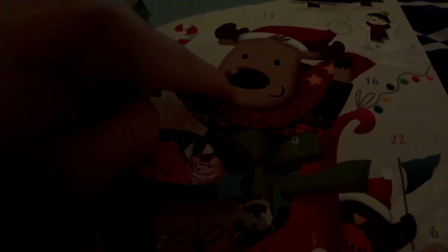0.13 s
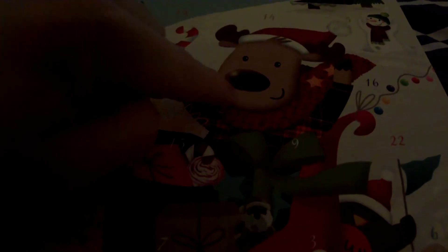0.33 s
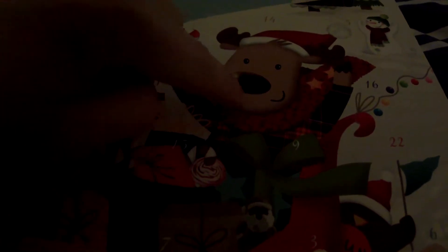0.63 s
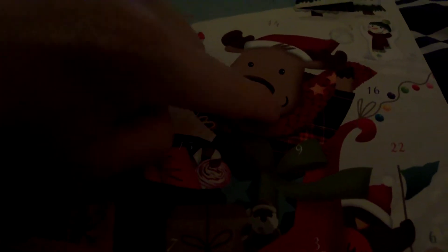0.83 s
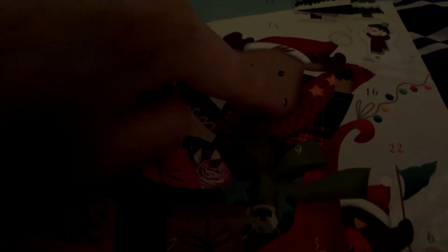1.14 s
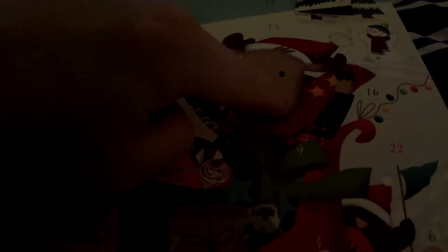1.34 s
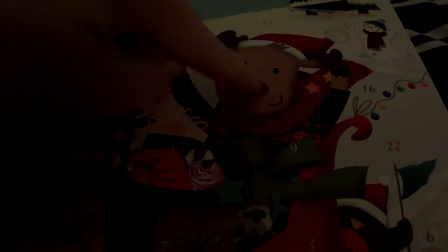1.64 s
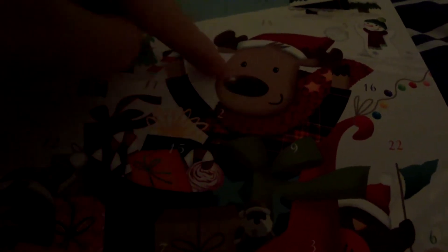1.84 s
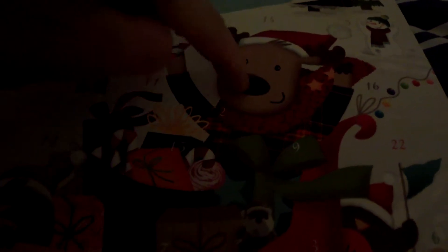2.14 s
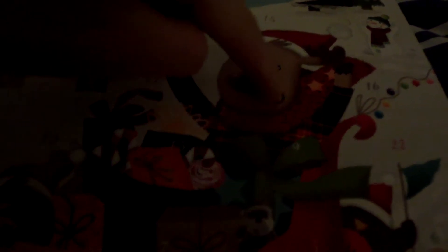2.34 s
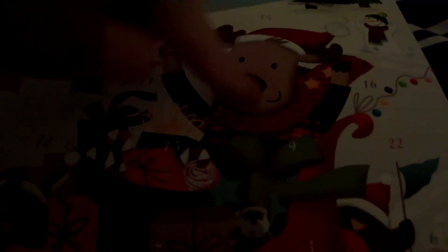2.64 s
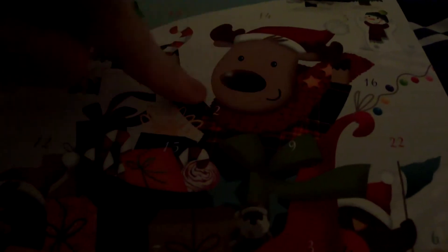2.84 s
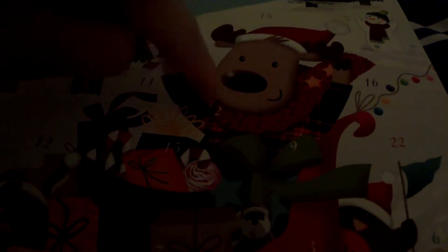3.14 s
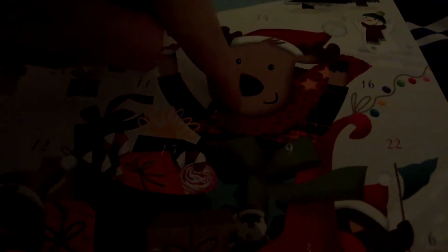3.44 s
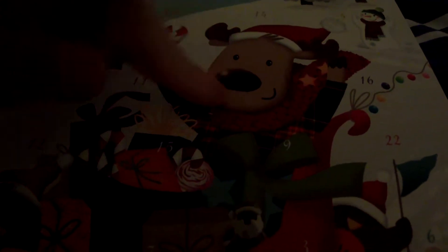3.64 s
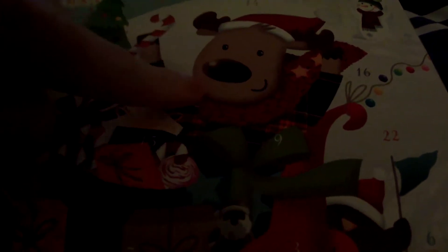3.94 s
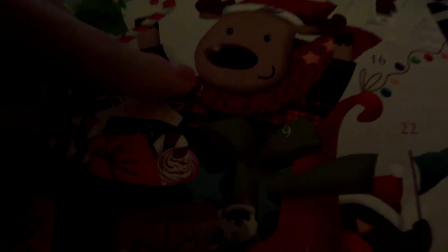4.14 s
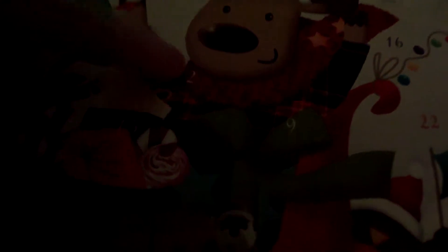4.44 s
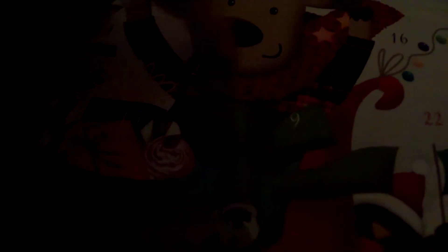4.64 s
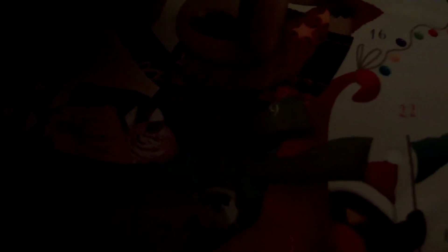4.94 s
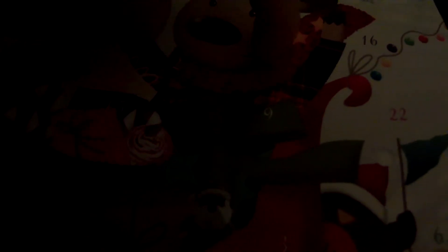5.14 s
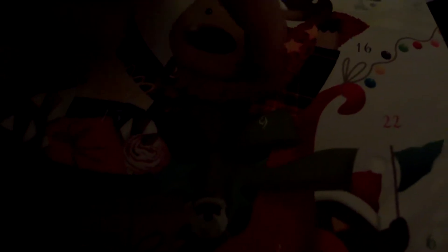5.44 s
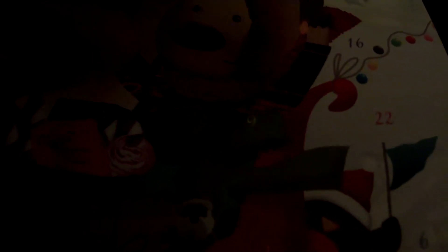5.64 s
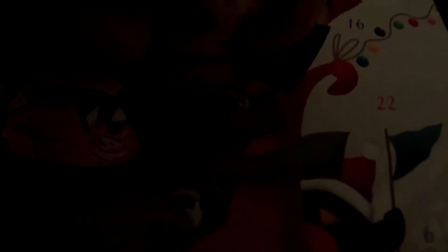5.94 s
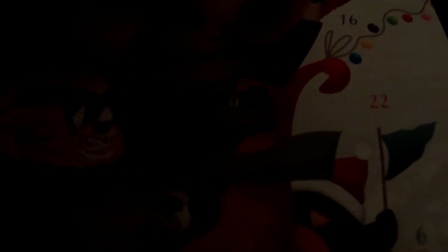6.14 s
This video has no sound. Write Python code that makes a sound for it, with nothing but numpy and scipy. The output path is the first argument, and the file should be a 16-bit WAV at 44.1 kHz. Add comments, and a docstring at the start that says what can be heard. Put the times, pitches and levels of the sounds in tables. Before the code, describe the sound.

A fingertip rubs and picks at a cardboard flap very near a small microphone in a quiet room. Dry crackles come in uneven clusters, with low handling bumps early on. Just after three seconds several hard snaps stand out, then the picking nearly stops, with faint dull taps. From about 4.7 seconds brisk, fine crackling returns until the end, over rumble and soft hiss.

```python
"""A fingertip rustles on a cardboard flap over rumble and hiss, with short crackles throughout, very near
a small microphone in a quiet room. Fingers and nails pick and press: fibres let go in swarms of tiny
breaks that ring the modes of the hollow box, and skin sticks and slips in smaller random bursts.
Slips of the hand send low pushes of pressure into the microphone; later the finger pad taps dully.
Faint sparse echoes give the room; a low drone comes and goes, and a thin steady whine lies above."""
import sys
import numpy as np
from scipy import signal
from scipy.fft import rfft, irfft
from scipy.io import wavfile
from scipy.ndimage import uniform_filter1d

SR = 44100
rng = np.random.default_rng(int(sys.argv[2]) if len(sys.argv) > 2 else 0)


def materialize(psi):
    """Save the field psi as 16-bit PCM at rate SR to the path in sys.argv[1].

    A 1-D psi becomes a single channel; in a 2-D psi each row is a channel.
    """
    bounded = np.clip(np.atleast_2d(psi).T, -1, 1)
    quanta = np.round(bounded * 32767).astype(np.int16)
    wavfile.write(sys.argv[1], SR, quanta)


def ratio_of_db(decibels):
    """Turn decibels (scalar or array-like) into linear amplitude factors; 0 dB maps to 1."""
    return 10 ** (np.asarray(decibels, float) / 20)


N = 276815  # samples, about 6.3 s

# low rumble of handling: t/s, level/dB rms
RUMBLE_LEVEL = [(0, -45.5), (.6, -48.5), (1.05, -45.5), (1.2, -36.5), (1.5, -48.5), (2.7, -45.5),
                (5.5, -45), (6.28, -50.5)]
# spectrum of the rumble: f/Hz, relative density/dB per Hz
RUMBLE_COLOUR = [(8, -21), (14, 8), (26, 5), (50, -12), (120, -9.5), (170, -23.5), (400, -32.5),
                 (1000, -100)]
# low drone that comes and goes: t/s, level/dB rms
DRONE_LEVEL = [(3.7, -66), (4.1, -53), (5.2, -53), (5.4, -66)]
# spectrum of the hiss: f/Hz, relative density/dB per Hz
HISS_COLOUR = [(88, 9), (150, 1.5), (388, -4.5), (844, -10), (1420, -61), (1630, -7), (1870, -28),
               (3160, -6), (4750, -12), (7130, -14.5), (9730, -24.5), (14300, -22), (15500, -32)]
# thin steady tone of the electronics: f/Hz, level/dB rms
WHINE = [(14425, -85)]
# strokes of the fingertip on the card: t of firmest press/s, drive of mid modes/dB,
# pressing time/s, easing time/s, high modes above mid/dB
STROKES = [(0.0, -49, .05, 0.056, -9), (.15, -55, 0.17, 0.69, -0.5), (.44, -54, 0.58, 0.037, -5),
           (0.588, -56, 0.049, .2, -1.5), (.94, -50, 0.35, 0.21, -4), (1.15, -51.5, .2, 0.18, -1),
           (1.75, -51, 0.14, 0.27, -1), (2.13, -49.5, 0.17, 0.15, -0.5), (2.35, -46, 0.19, 0.26, 0.5),
           (2.67, -56, 0.1, .5, 1), (2.9, -51.5, 0.37, 0.24, -10.5), (3.03, -44.5, 0.16, 0.98, 1.5),
           (3.23, -32.5, 0.13, 0.12, -8), (3.46, -45.5, .04, 0.1, 8), (3.53, -49, 0.1, 0.13, -5),
           (3.72, -58, 0.13, 0.073, -12), (3.92, -56.5, 0.078, 0.17, -2), (4.3, -57, 0.17, 0.21, -1.5),
           (4.75, -62, 0.37, 0.11, 11.5), (4.84, -60.5, 0.26, 0.083, 5.5), (5.09, -47.5, 0.093, 0.063, -5),
           (5.23, -55.5, 0.059, 0.046, 1), (5.47, -46.5, 0.16, 0.21, -1.5), (5.83, -51, 0.054, .2, -1),
           (5.96, -43, 0.14, 0.21, -11), (6.28, -55, 0.13, .1, -11)]
# fibres letting go: t/s, drive of mid modes/dB, low modes above mid/dB, high modes above mid/dB,
# nominal length/ms
CRACKLES = [(0.039, -43.5, -17, -6, 15.4), (0.068, -48.5, -2, 2, 20.4), (0.198, -45.5, -5, 1, 11.5),
            (0.218, -42, -8.5, -4, 21), (0.239, -47, -8, 6, 7), (0.254, -45, -16, 2.5, 10.4),
            (0.269, -44, -24, -2, 8.7), (0.281, -41.5, -9, -15, 15), (0.317, -44.5, -5, 10.5, 12),
            (0.336, -44, -12, -1.5, 17), (0.391, -43.5, -13, -5, 7.5), (0.433, -44, 1, -8.5, 8.2),
            (0.459, -47, -2, -3, 6), (0.468, -45.5, -3.5, -1.5, 12), (0.547, -38.5, -11, 1, 12.2),
            (0.8, -43, -3, -2, 11.3), (0.847, -50, 6, -6, 7.9), (0.902, -39, -5, 8, 6),
            (0.874, -58, 0, -10, 3.9), (0.931, -37, -2, -6, 9), (0.95, -33.5, -1.5, -7, 6.5),
            (0.991, -41.5, -10, -6.5, 16), (1.015, -45, -14, -1, 6.4), (1.044, -45, -7, 0, 12),
            (1.088, -41, -4.5, 1, 17), (1.125, -34, -2.5, -5, 7.8), (1.244, -41, -22, 3, 5.5),
            (1.278, -47, -5.5, -3.5, 21.5), (1.367, -32, -11, -7.5, 5.5), (1.45, -38, -5, 0, 14),
            (1.654, -46.5, -1, -14, 13), (1.677, -44, -2.5, 2.5, 12.6), (1.704, -37.5, -10, -1.5, 12.7),
            (1.759, -32, -17, -5, 6.2), (1.773, -46, -2, 2, 11), (1.826, -46, -25, -0.5, 9.3),
            (1.871, -45.5, -7, -1, 19), (1.923, -41, -17, 1.5, 9.3), (2.046, -46.5, -27, 6, 5.3),
            (2.084, -53, -12, 6, 5), (2.123, -38, -9, 0.5, 9.3), (2.14, -41, -21, -7, 8.1),
            (2.175, -51.5, -21, 1, 12), (2.24, -44.5, -13, 3, 16), (2.278, -40.5, -11, -3, 14),
            (2.308, -45.5, -6, 3.5, 13), (2.339, -40.5, -14, -5, 15), (2.361, -34.5, -18, -1.5, 10),
            (2.445, -52, -12, 1.5, 7.2), (2.467, -48.5, -0.5, 7, 8), (2.489, -35, -33, -4.5, 6.4),
            (2.577, -41.5, -25, -3.5, 10.7), (2.646, -37, -6.5, -4.5, 11.4), (2.679, -45.5, -3, 6, 4),
            (2.729, -36.5, -7.5, -2, 5.8), (2.803, -42, -29, -2.5, 9.1), (2.855, -44.5, 0.5, 1, 7.6),
            (2.9, -45, -25, -6, 10.6), (2.978, -43, -11, 3, 12.6), (3.019, -46, -21, -2, 17),
            (3.065, -46.5, -9, 6, 24), (3.082, -26.5, -11.5, -7, 8.3), (3.099, -37, -30, 3, 24),
            (3.167, -43.5, -21, 8.5, 15), (3.2, -22.5, -3.5, -1.5, 8.4), (3.227, -17.5, -5, -12.5, 5.8),
            (3.238, -31, 2, -2.5, 14.7), (3.328, -53, -13, -9, 4.5), (3.372, -42, 1, 3, 2.67),
            (3.423, -16.5, -5.5, -3.5, 8.4), (3.507, -24, -8.5, -2.5, 11.6), (3.677, -53, 0.5, 4.5, 7.9),
            (3.703, -52, -1, -4, 9.6), (3.739, -48.5, 3.5, -3.5, 10.8), (3.884, -41, -17, 0, 4.3),
            (3.9, -52.5, -2, 0, 4.3), (3.948, -49.5, 6, -18, 7.7), (4.145, -58, -6, 1, 4),
            (4.163, -48.5, -1.5, -9, 6.9), (4.195, -66, -3, 15, 25), (4.355, -63, 8.5, -14, 12),
            (4.38, -55, -14, 11.5, 2.3), (4.522, -57, -15, 14, 3.5), (4.691, -38, -8, -10, 6.5),
            (4.799, -41.5, -16, 2.5, 4.3), (4.82, -39.5, -12, 3, 2.4), (4.844, -38, -6, -0.5, 4.3),
            (4.86, -43.5, -14, -1, 4.6), (4.876, -48.5, -4, -1, 9.1), (4.947, -59, -12, 20, 3.4),
            (4.964, -44.5, -19, -3, 7.1), (5.009, -44.5, -4, -23, 5.2), (5.031, -38.5, -6.5, -8.5, 9.1),
            (5.057, -38.5, -9, -1, 5.3), (5.1, -33, -7, -2, 3), (5.118, -46, -2, -6, 3.8),
            (5.131, -37.5, -10, 2, 4.2), (5.142, -43.5, -5.5, 2, 6.5), (5.189, -45, -2, -0.5, 9.8),
            (5.228, -43.5, -0.5, -15, 9.7), (5.395, -40.5, -4, -9, 6.3), (5.409, -54, -26, 13, 12),
            (5.43, -41, -16, 1, 13), (5.444, -34, -17, -2, 6.8), (5.469, -36, -4, 2.5, 5),
            (5.482, -39.5, -7.5, 5, 13), (5.522, -40, -8, 0, 15), (5.561, -36, -17, -4.5, 11),
            (5.577, -44.5, 6, 9, 2), (5.594, -39, -10, -2, 5.9), (5.622, -36, -16, -11, 12),
            (5.649, -36.5, -6, -2, 4.5), (5.657, -42, -28, 3, 7.9), (5.677, -48.5, -28, 2.5, 14),
            (5.794, -45, -12, 3.5, 15), (5.819, -49.5, 0, 11.5, 6.2), (5.855, -36, -8, -10.5, 8.7),
            (5.885, -40, -8, -1, 4.4), (5.906, -40, -5.5, -3, 7.2), (5.922, -46, -5, 2, 9),
            (5.934, -41.5, -8, 0, 12), (5.963, -44, -7, 7, 8.6), (5.978, -41.5, -12, 3, 5.4),
            (5.989, -26.5, -7.5, -9, 1.7), (5.996, -43, -8, 6, 11), (6.066, -28.5, -4.5, -1, 8.4),
            (6.131, -37, -8, -4.5, 8), (6.169, -32, -25, -0.5, 6.2), (6.22, -40, -2, -1.5, 10.2),
            (6.24, -42, -6, -3, 14.6), (6.268, -41, -4, 6, 4.2)]
# what the hollow box rings with, in low, mid, high and top groups: f/Hz, width/Hz, relative level/dB
BOX_MODES = [
    [(302, 43, -7.5), (609, 116, -1), (888, 160, 1.5), (1170, 220, 2)],
    [(1676, 118, 0.5), (2062, 131, 0.5), (2455, 182, -5), (2774, 220, 0), (3360, 1140, 0.5),
     (3855, 260, -4)],
    [(4360, 890, -3), (5080, 430, 1.5), (5550, 900, 4), (6440, 670, 5.5), (7320, 480, 2.5),
     (8010, 134, -1.5), (8860, 440, -4)],
    [(10400, 760, -8), (13300, 4000, -13)],
]
# sudden pushes of pressure at the microphone: t/s, depth before the vent/dB, recovery scale/ms
PUSHES = [(0.0702, -27, 9.7), (0.17, -32.5, 5.5), (0.5485, -36, 4.4), (0.749, -23.5, 6.4),
          (0.7902, -23, 4.1), (0.824, -23.5, 4.8), (0.849, -23.5, 1.6), (0.9488, -31, 0.93),
          (1.101, -33, 2), (1.1137, -29.5, 1.7), (1.1247, -23, 0.86), (1.1582, -32, 0.92),
          (1.1768, -30.5, 1.5), (1.189, -31, 0.94), (1.2021, -34, 1.5), (1.212, -40, 1.2),
          (1.2315, -40, 1.6), (1.249, -30, 1.3), (1.279, -20, 1.2), (1.2873, -26.5, 1.4),
          (1.4497, -16, 1.16), (2.299, -22, 2.7), (2.978, -28.5, 0.46), (3.2797, -24, 11),
          (4.6696, -33.5, 4.2), (5.8155, -24.5, 0.33), (6.0663, -16.5, 0.91)]
# dull taps of the finger pad: t/s, relative strength/dB, quarter of the contact/ms
TAPS = [(2.744, -48, 1.34), (3.207, -43, 1.8), (3.239, -39.5, 1.5), (3.508, -34, 0.76), (3.5126, -35, 0.8),
        (3.738, -48.5, 1.2), (3.753, -47, 1.85), (3.934, -47, 1.85), (3.958, -46.5, 2.7), (3.974, -44, 1.7),
        (3.994, -47.5, 1.4), (4.345, -41.5, 1.64), (4.359, -46.5, 1.12)]
# dying away of the room's echoes: f/Hz, t60/s
ROOM_DECAY = [(300, 0.28), (1000, 0.16), (3000, 0.2), (8000, 0.21)]

REST_DB = -70  # the fingertip barely touching, between strokes


def evened(x):
    """Scales to rms 1."""
    return x / np.sqrt(np.mean(x ** 2) + 1e-20)


def read(points, hz):
    """Reads a table on a log-frequency axis."""
    f, value = np.transpose(points)
    return np.interp(np.log(hz + 1), np.log(f + 1), value)


def add(mix, s, sound):
    """Mixes a sound in at s seconds, cut off at the end of the mix."""
    part = mix[..., round(s * SR):][..., :sound.shape[-1]]
    part += sound[..., :part.shape[-1]]


def noise(colour):
    """Steady noise of a given spectrum, rms 1."""
    spectrum = rfft(rng.standard_normal(N))
    weight = ratio_of_db(read(colour, np.fft.rfftfreq(N, 1 / SR)))
    return evened(irfft(spectrum * weight, N))


def grit(per_s, spread_db):
    """Tiny breaks at random moments, a few much larger than the rest; rms 1."""
    size = ratio_of_db(spread_db * np.minimum(rng.exponential(1, N), 4))
    happens = rng.random(N) < per_s / SR
    return evened(size * rng.standard_normal(N) * happens)


def background(hiss_db=-56.5, drone_hz=41):
    """Noise bands make the rumble, the low drone and the hiss; a sine makes the thin whine."""
    t = np.arange(N) / SR
    rumble = ratio_of_db(np.interp(t, *np.transpose(RUMBLE_LEVEL))) * noise(RUMBLE_COLOUR)
    drone_colour = [(drone_hz - 4, -60), (drone_hz, 0), (drone_hz + 4, -60), (80, -120)]
    drone = ratio_of_db(np.interp(t, *np.transpose(DRONE_LEVEL))) * noise(drone_colour)
    hiss = ratio_of_db(hiss_db) * noise(HISS_COLOUR)
    whine = sum(np.sqrt(2) * ratio_of_db(db) * np.sin(2 * np.pi * hz * t) for hz, db in WHINE)
    return rumble + drone + hiss + whine


def drag(light_low_db=-1.5, damping=0.24):
    """Strokes press up from rest and ease off, damping the low modes; gives mid, low and high dB."""
    t = np.arange(0, N + 256, 128) / SR
    s, db, press_s, ease_s, bright_db = np.transpose(STROKES)[:, :, None]
    away = np.where(t < s, (s - t) / press_s, (t - s) / ease_s)
    over_db = np.maximum((db - REST_DB) * (1 - away), 0)
    firm_db = over_db.max(0)
    mid_db = REST_DB + firm_db
    low_db = light_low_db - damping * firm_db  # damping: dB lost for each dB of pressure
    high_db = (bright_db * over_db).sum(0) / (over_db.sum(0) + 1.0)
    return [np.interp(np.arange(N) / SR, t, curve) for curve in (mid_db, low_db, high_db)]


def rustle(bursts_per_s=240, spread_db=2.5, dying_ms=0.62, steady=2.7):
    """Skin sticks and slips: small random crackles over a steady scrape, following the drag."""
    mid_db, low_db, high_db = drag()
    ms = np.arange(900) * 1000 / SR
    burst = ms * np.exp(-ms / dying_ms)
    clumps = []
    for _ in range(5):
        slips = abs(grit(bursts_per_s, spread_db))
        clumps.append(evened(signal.oaconvolve(slips, burst)[:N]))
    grip = np.clip((mid_db + 76.5) / 16, .25, 1)  # a light touch glides smoothly, a firm one slips
    # one pattern is shared, and each group of modes also slips alone
    uneven = steady + grip * (clumps[0] + 0.35 * np.array(clumps[1:]) - 1.4)
    level = ratio_of_db(mid_db + np.array([low_db, 0 * mid_db, high_db, high_db / 2]))
    return level * evened(uneven) * grit(per_s=9500, spread_db=1.5)


def faint_crackles(count=90, above_drag_db=5.5, spread_db=1, colour_db=0.5, shortest_ms=3.3, longest_ms=9.7):
    """Rows of small crackles at random moments, as strong and as bright as the drag allows."""
    when, size, low, high, length = rng.random((count, 5)).T
    mid_db, low_db, high_db = (curve[(when * N).astype(int)] for curve in drag())
    return zip(when * N / SR,
               mid_db + above_drag_db + spread_db * (2 * size - 1),
               low_db + colour_db * (2 * low - 1),
               high_db + colour_db * (2 * high - 1),
               shortest_ms + (longest_ms - shortest_ms) * length)


def crackles(jump=0.39, tick_ms=0.96, swell_share=0.59, dying_share=0.5, snap_slope=0.049):
    """A swarm of breaks that swells for a few ms and thins out; the first breaks are the sharpest."""
    ms, force = np.arange(3000) * 1000 / SR, np.zeros((4, N))
    for s, mid_db, low_db, high_db, length_ms in [*CRACKLES, *faint_crackles()]:
        snap = ratio_of_db(snap_slope * (mid_db - REST_DB))  # strong breaks swell quicker
        swell_ms = swell_share * length_ms / snap
        dying_ms = dying_share * length_ms
        swell = jump + (1 - jump) * np.minimum(ms / max(swell_ms, .5), 1)
        swarm = swell * np.exp(-np.maximum(ms - swell_ms, 0) / max(dying_ms, .5))
        first = 0.73 * swarm + np.exp(-ms / tick_ms)  # drives the top group
        level = ratio_of_db(mid_db + np.array([[low_db], [0], [high_db], [high_db / 2]]))
        add(force, s, level * [swarm, swarm, swarm, first])
    shared = grit(per_s=12000, spread_db=2.0)
    return force * (shared + 0.26 * rng.standard_normal((4, N)))


def box(drive, wander_db=2.0, wander_ms=25):
    """Each row of the drive rings one group of modes; the moving fingers free and damp single modes."""
    t, out, hop = np.arange(2048) / SR, np.zeros(N), 128
    span = max(round(wander_ms * SR / 1000 / hop), 1)
    for row, group in zip(drive, BOX_MODES):
        rings = []
        for k, (hz, width, db) in enumerate(group):
            strength = (-1) ** k * ratio_of_db(db) * np.sqrt(width)
            rings.append(strength * np.exp(-np.pi * width * t) * np.sin(2 * np.pi * hz * t))
        rings = np.array(rings)
        rings = rings / np.linalg.norm(rings.sum(0))
        free = evened(uniform_filter1d(rng.standard_normal((len(group), N // hop + 2)), span, 1))
        shares = evened(ratio_of_db(wander_db * free))
        for ring, share in zip(rings, shares):
            wander = np.interp(np.arange(N) / hop, np.arange(len(share)), share)
            out += signal.oaconvolve(row * wander, ring)[:N]
    return out


def pushes(fall_ms=0.59, fall_share=0.076, rebound_hz=28, rebound_width=40, shake=0.08):
    """Pressure drops quickly and creeps back; the microphone vent lets it overshoot and swing."""
    ms, pressure, stir = np.arange(1500) * 1000 / SR, np.zeros(N), np.zeros(N)
    for s, db, back_ms in PUSHES:
        fall = 1 - np.exp(-(ms / (fall_ms + fall_share * back_ms)) ** 2)
        recovery = np.exp(-(ms / (2.6 * back_ms)) ** 2)
        add(pressure, s - .0006, -ratio_of_db(db) * fall * recovery)
        add(stir, s, ratio_of_db(db) * np.exp(-ms / 9))
    w = 2 * np.pi * rebound_hz
    vent = signal.bilinear([1, 0, 0], [1, 2 * np.pi * rebound_width, w * w], SR)  # a second-order high-pass
    shudder = noise([(100, -35), (350, 5), (1100, -1.0), (3000, -80)])
    return signal.lfilter(*vent, pressure) + shake * stir * shudder


def taps(thud_db=4):
    """The soft pad of a finger strikes the panel: a short contact rings higher than a long one."""
    force, thud, t = np.zeros(N), np.zeros(N), np.arange(2048) / SR
    for s, db, contact_ms in TAPS:
        u = np.arange(0, 1, 1000 / (4 * contact_ms * SR))  # progress through the contact
        chatter = np.sin(np.pi * u) ** 2 * np.sin(4 * np.pi * u)  # it chatters twice
        add(force, s, ratio_of_db(db) * chatter / contact_ms)
        add(thud, s, ratio_of_db(db + thud_db) * np.sin(np.pi * u) ** 14)  # the panel itself jumps once
    ring = sum(ratio_of_db(db) * np.exp(-np.pi * width * t) * np.cos(2 * np.pi * hz * t)
               for hz, width, db in BOX_MODES[0])
    return signal.oaconvolve(force, ring / np.linalg.norm(ring))[:N] + thud


def room(x):
    """Sparse echoes of random sign, each band dying at its own speed."""
    echoes = np.zeros(SR // 2)
    at = np.arange(200, len(echoes) - 20, 20)
    echoes[at + rng.integers(0, 20, len(at))] = rng.choice([-1., 1.], len(at))
    hz, t, z = signal.stft(echoes, SR, nperseg=256)
    decay = ratio_of_db(-60 * t / read(ROOM_DECAY, hz)[:, None])
    tail = signal.istft(z * decay, SR, nperseg=256)[1]
    return signal.fftconvolve(x, tail / np.linalg.norm(tail))[:N]


def scene(top_db=-30.5, room_db=-11.0):
    """Card sounds close by with their faint echoes, pushes at the microphone, and background."""
    force = (rustle() + crackles()) * ratio_of_db([[0], [0], [0], [top_db]])  # the top group speaks weakly
    card = box(force) + taps()
    return (card + ratio_of_db(room_db) * room(card) + pushes() + background())[None]


def top_cut(x):
    """Nothing passes above the cut-off."""
    return signal.sosfilt(signal.butter(12, 15820, fs=SR, output="sos"), x)


def record(dry, edge_hz=15200, offset_db=-60):
    """Limits the band of the microphone signal and adds the constant offset of the converter."""
    limited = signal.oaconvolve(dry, signal.firwin(255, edge_hz, fs=SR)[None], "same")
    mix = limited + ratio_of_db(offset_db)
    return top_cut(mix)


dry = scene()
out = record(dry)
materialize(out)
```